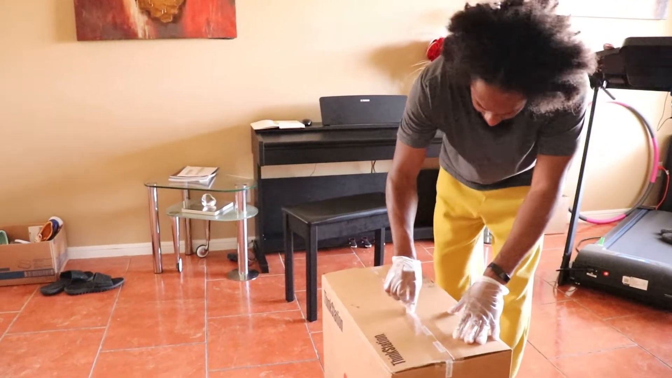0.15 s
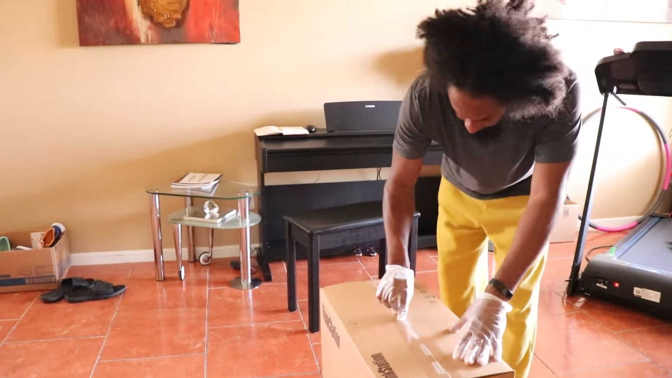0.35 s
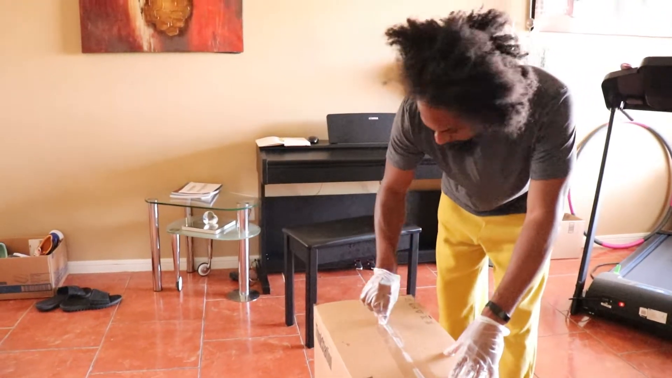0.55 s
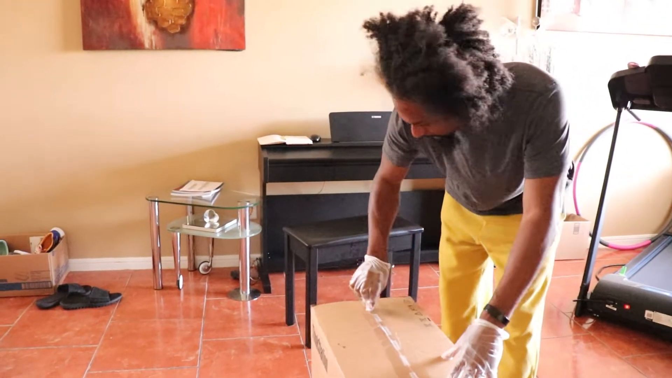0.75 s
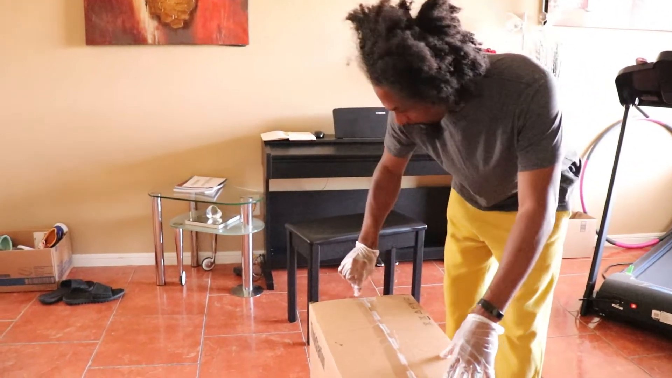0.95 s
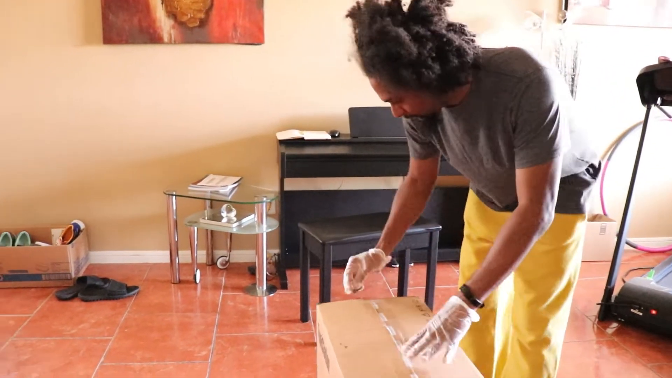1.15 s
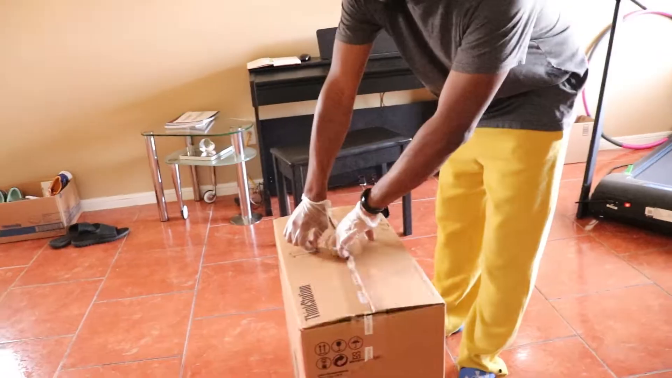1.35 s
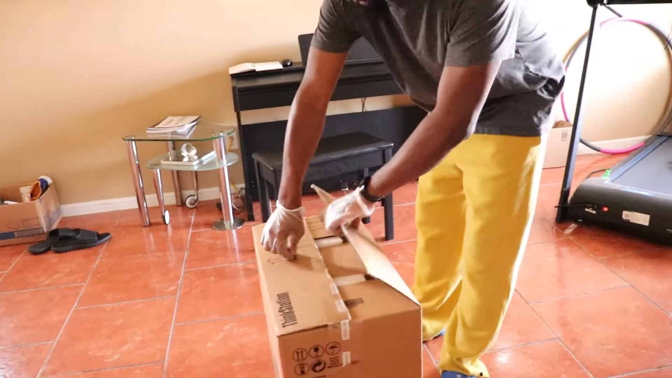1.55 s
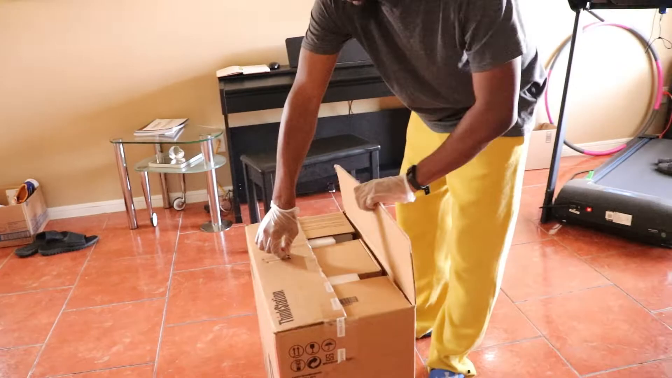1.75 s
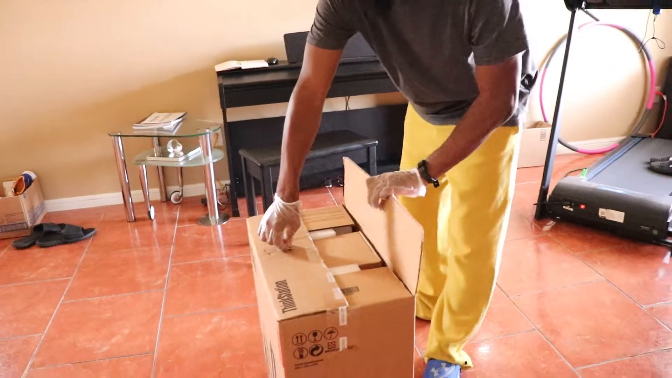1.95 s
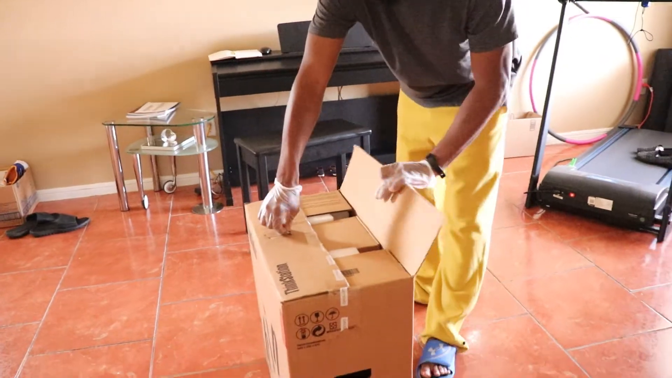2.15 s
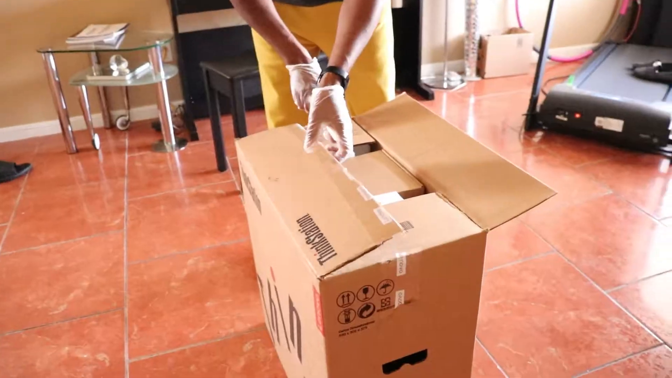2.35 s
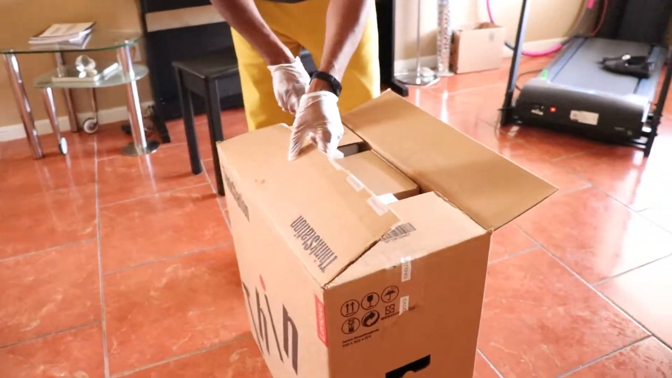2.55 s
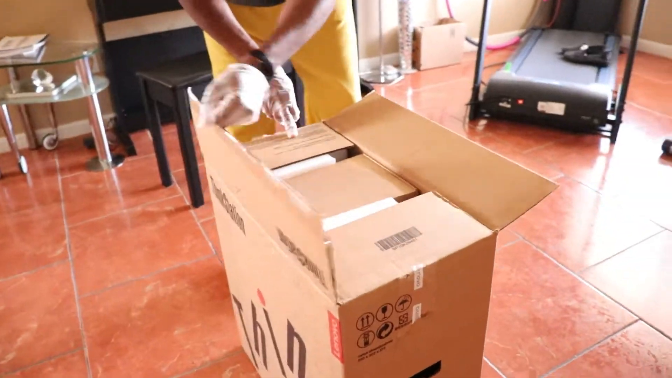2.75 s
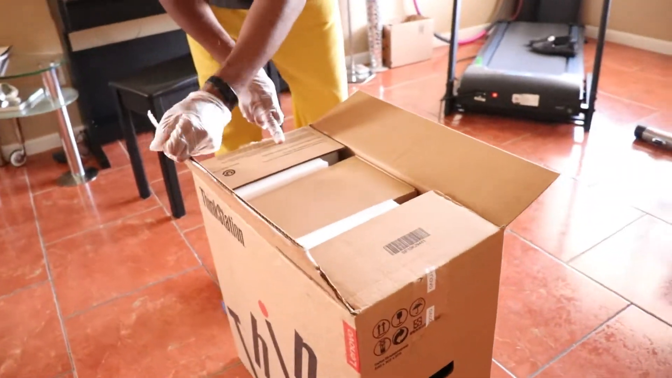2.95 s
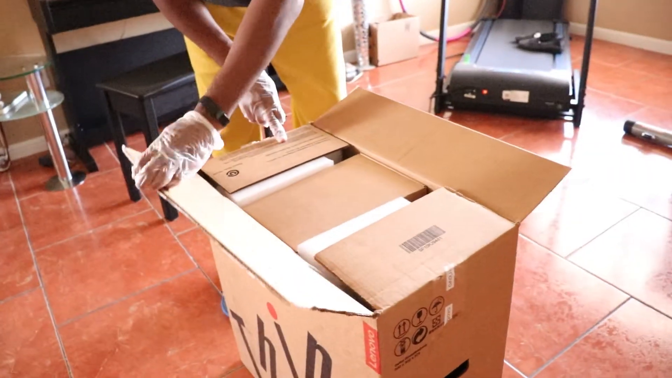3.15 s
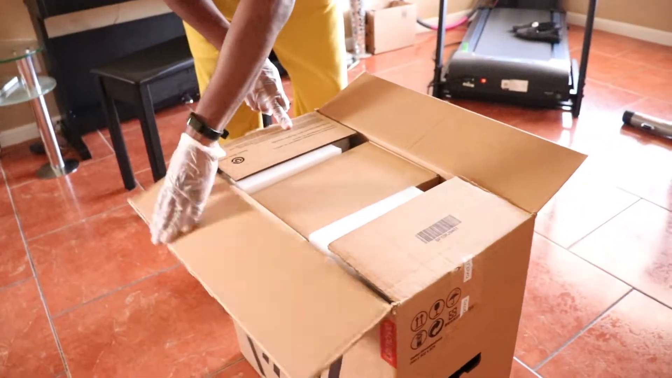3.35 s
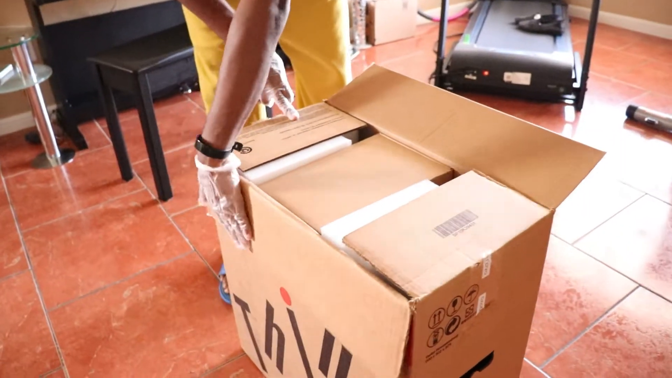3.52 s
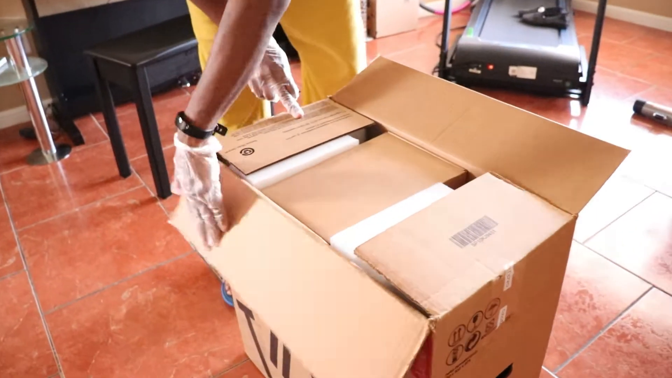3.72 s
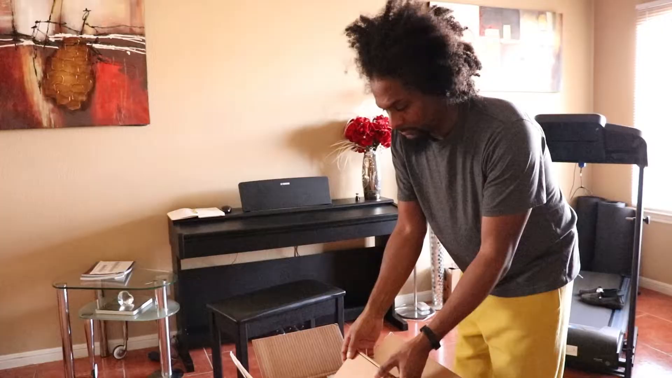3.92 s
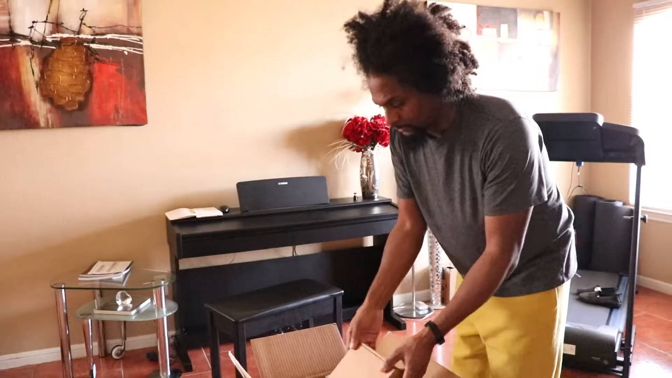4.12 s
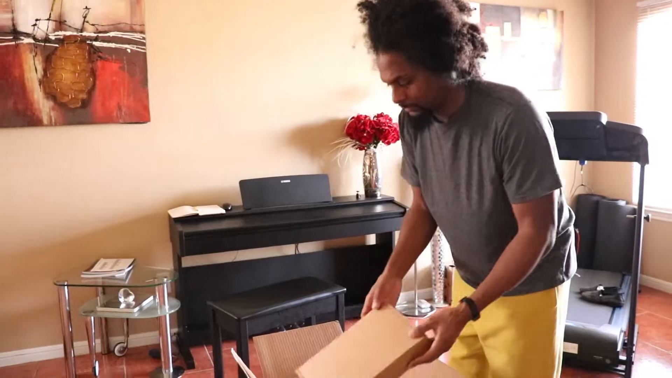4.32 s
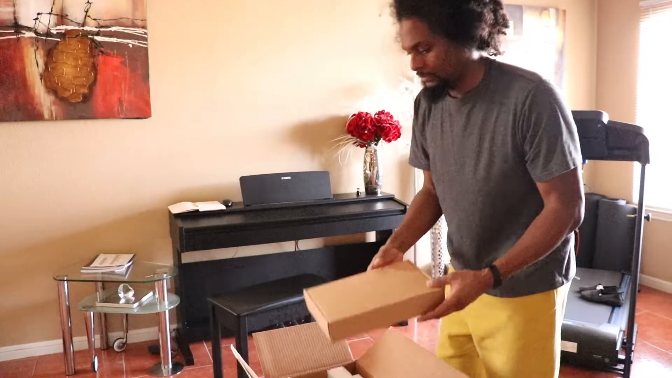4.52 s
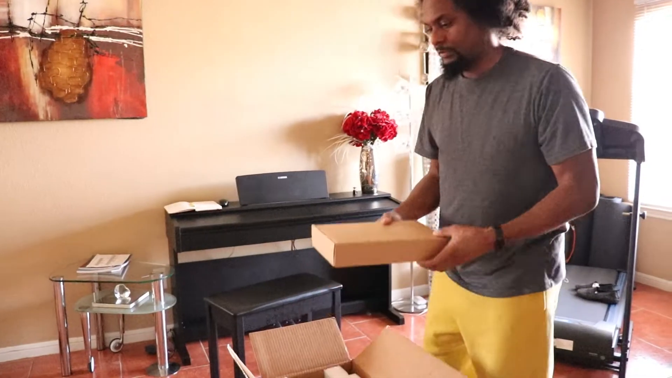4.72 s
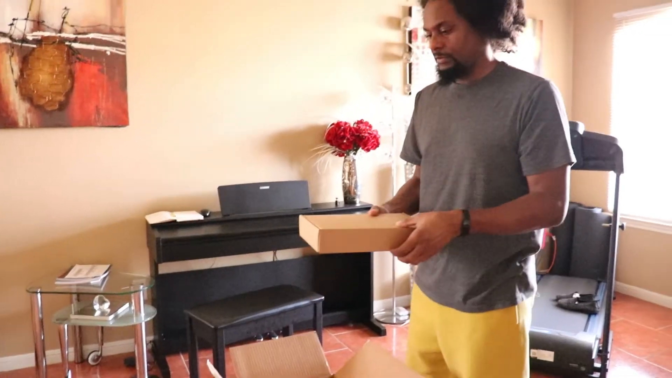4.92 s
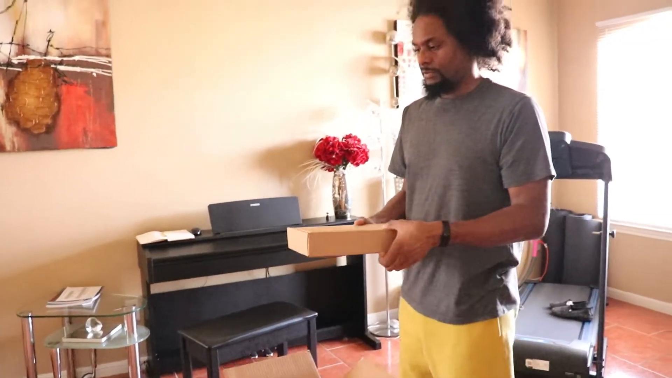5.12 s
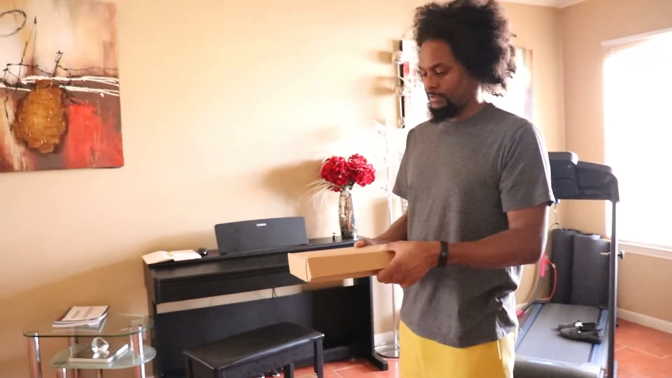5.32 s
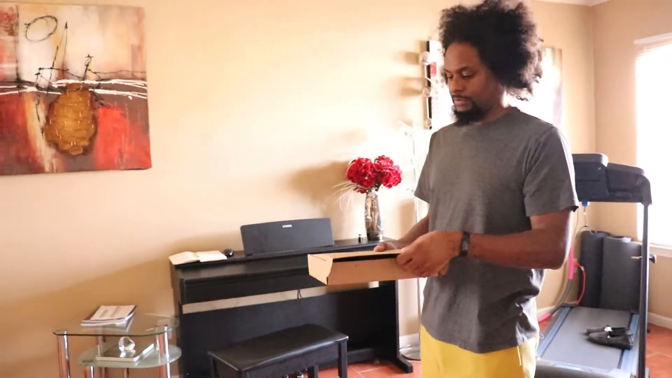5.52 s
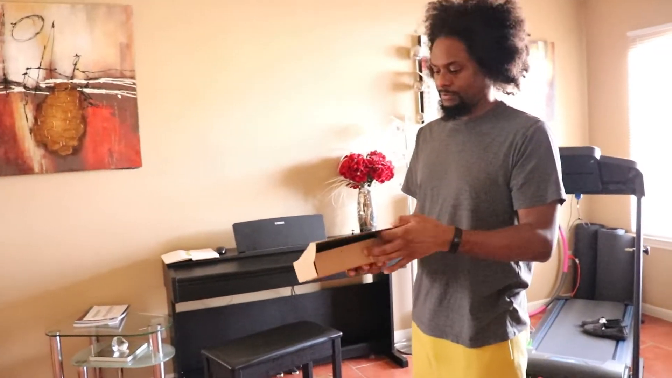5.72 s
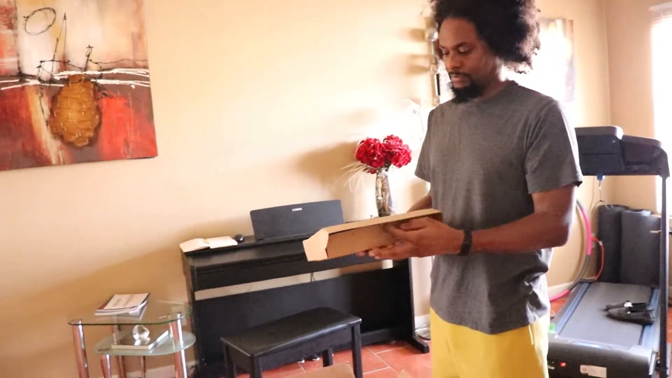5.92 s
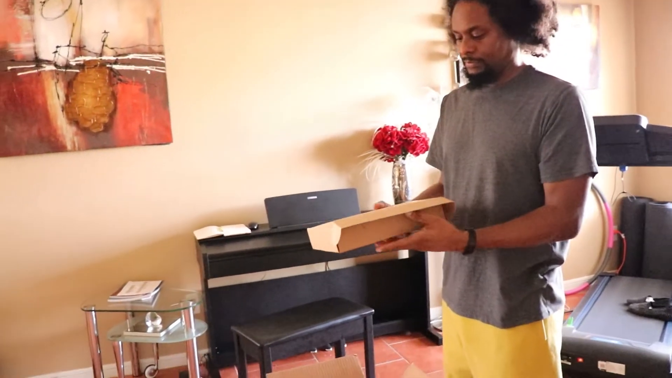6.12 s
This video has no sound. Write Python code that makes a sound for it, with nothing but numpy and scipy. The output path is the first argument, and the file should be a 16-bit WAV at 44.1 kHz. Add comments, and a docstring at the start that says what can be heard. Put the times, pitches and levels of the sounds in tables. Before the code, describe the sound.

Hands scrape and pull open a cardboard box, its flaps cracking and knocking hollowly in an echoing room, followed by softer cardboard sliding.

```python
"""Gloved hands brush over cardboard, and a flap pops free with a hollow knock in a tiled living room.
A shipping box is being opened: its flaps fold back and strike it, exciting the panels and the air inside.
Creases and tape snap in short bursts; stick-slip friction makes the board scrape, crackle and squeak.
A flat inner box is then lifted out and its lid slides open. The hard room rings after every blow."""
import sys
import numpy as np
from scipy import signal
from scipy.fft import rfft, irfft
from scipy.io import wavfile
from scipy.ndimage import uniform_filter1d

SR = 44100
rng = np.random.default_rng(int(sys.argv[2]) if len(sys.argv) > 2 else 0)


def transcribe(signal):
    """Save signal, clipped to [-1, 1], as a 16-bit WAV file at the path in sys.argv[1]."""
    frames = np.atleast_2d(signal).T
    limited = np.clip(frames, -1, 1)
    pcm = np.round(limited * 32767).astype(np.int16)
    wavfile.write(sys.argv[1], SR, pcm)


N = 272390

# spectrum of the steady background: (frequency [Hz], relative level [dB])
BACKGROUND_SPECTRUM = [(15, -39), (25, -20), (80, 3.5), (285, 3.5), (463, -27), (531, 2), (1040, -1),
                       (1370, -3), (2690, -6.5), (3340, -7), (6210, -13), (14800, -14), (16000, -17)]
# reverberation time of the room: (frequency [Hz], T60 [s])
REVERB_T60 = [(100, 0.33), (350, 0.58), (700, 0.93), (1500, 0.95), (3500, 0.94), (7000, 0.83),
              (14000, 0.32)]
# strength of the reverberation: (frequency [Hz], level re direct sound [dB])
REVERB_SPECTRUM = [(40, -11), (110, -4.5), (230, 1), (300, 5), (400, -4.5), (550, -1.5), (1200, -2),
                   (1900, -5), (3200, -3), (7000, -2), (14000, -9)]
# low modes of box and room: (frequency [Hz], relative level [dB], T60 [s])
LOW_MODES = [(59.4, -5, 0.52), (82, -23, 0.52), (118.4, -0.5, 0.45), (164.1, -4, 0.34), (190.3, -5.5, 0.69),
             (233.3, 0, 0.73), (260.8, -6, 0.49), (362.3, -4.5, 0.97), (367, -27, 0.47)]

# rubbing strokes on each box: (start [s], swell [s], release [s], scrape [dB], crackle [dB], drumming [dB])
OUTER_BOX_STROKES = [ (0, 0.0033, 0.16, -39.5, -53.5, -37.5), (.1, 0.14, 0.3, -49, -57, -46),
                     (.56, 0.035, 0.12, -53.5, -44.5, -39), (.64, 0.27, 0.17, -35.5, -48.5, -40.5),
                     (.91, .05, 0.14, -42.5, -42.5, -42), (1.04, 0.067, 0.33, -74, -53.5, -63),
                     (1.35, 0.016, 0.4, -48.5, -43, -47.5), (1.49, 0.0057, 0.28, -26.5, -47.5, -22),
                     (1.52, 0.051, .15, -30.5, -35, -34), (1.78, 0.029, 0.032, -53.5, -47, -60),
                     (2.1, 0.13, 0.13, -76.5, -60, -61), (2.366, .01, 0.33, -47, -44.5, -36),
                     (2.7, 0.011, 0.32, -32.5, -40.5, -27), (2.78, 0.067, .15, -31, -58, -37),
                     (3.06, 0.055, 0.2, -63, -52, -51.5), (3.33, 0.11, 0.1, -53.5, -45.5, -50.5),
                     (3.47, 0.044, 0.042, -40, -37, -40.5), (3.56, 0.061, 0.32, -47, -64, -37),
                     (3.92, 0.024, .05, -70, -55, -66)]
INNER_BOX_STROKES = [ (3.96, 0.0078, 0.35, -87, -96, -54), (4.1, 0.021, 0.68, -54.5, -67.5, -58),
                     (4.16, 0.096, 0.11, -47, -50, -58.5), (4.54, 0.031, 0.049, -65, -78, -65),
                     (4.65, 0.03, 0.11, -50.5, -68.5, -56.5), (4.885, 0.018, 0.07, -59, -77.5, -58),
                     (4.95, 0.011, 0.34, -62, -77, -60), (5.186, 0.007, .3, -45, -56, -50),
                     (5.25, 0.13, 0.2, -38.5, -50, -50.5), (5.39, 0.074, 0.33, -39.5, -55, -47),
                     (5.71, 0.033, 0.17, -38.5, -50, -51), (6.065, 0.036, 0.11, -46.5, -80, -48)]
# friction spectra of each box's surface, the fibres and the panels: (frequency [Hz], relative level [dB])
OUTER_SCRAPE_SPECTRUM = [(40, -29), (300, -12.5), (480, -0.5), (700, 3.5), (1000, 5), (1400, 4), (2000, -2),
                         (3200, -2), (4500, -8.5), (7000, -16.5), (15000, -79)]
INNER_SCRAPE_SPECTRUM = [(270, -17), (420, 8.5), (510, 7.5), (600, 4), (1000, -0.5), (1350, 1.5),
                         (2000, -1.5), (2700, -1), (3300, 2.5), (4400, -8), (7000, -28), (15000, -54.5)]
CRACKLE_SPECTRUM = [(200, -26), (1500, -1), (2400, 0), (3250, 6), (4300, 2.5), (6000, 1), (9000, -3),
                    (15000, -12)]
DRUMMING_SPECTRUM = [(35, -48), (70, 1), (130, -5), (190, 2), (250, 4.5), (305, 7), (390, 4.5), (500, 0),
                     (620, -3), (900, -33.5)]
# spectra of a slipping fold, cracking board and slapping board: (frequency [Hz], relative level [dB])
FOLD_SPECTRUM = [(2000, -24), (3200, -12), (4000, 5), (5300, 4.5), (6500, -5), (7900, -5), (9500, -31),
                 (15000, -25)]
BOARD_SPECTRUM = [(400, -9.5), (850, 7.5), (1250, 10), (1650, 5), (2300, 2.5), (3100, 3), (4200, 0.5),
                  (6500, 1), (9500, -1), (15000, -2.5)]
SLAP_SPECTRUM = [(150, -14), (450, 7), (600, 0.5), (800, -3), (1100, -3), (1350, -3), (1600, -24),
                 (5000, -40.5), (15000, -51.5)]
# a fold sticking and slipping: (time [s], level [dB], slip rate [1/s], length [s])
FOLD_SQUEAKS = [(2.834, -29.5, 1305, 0.0079), (2.839, -32, 1325, 0.094), (2.932, -45, 1290, 0.0042)]
# creases and edges cracking: (time [s], level [dB], centre [Hz], length [s], roll-off [dB/octave])
CREASE_CRACKS = [ (0.2192, -27.5, 2980, 0.0038, 11.5), (0.302, -33, 2230, 0.016, 9),
                 (.559, -28.5, 2770, 0.0041, 20.5), (0.586, -36.5, 1470, 0.019, 23),
                 (.7713, -33, 3040, .003, 28), (0.877, -36, 1900, .016, 25), (0.96, -30, 3300, 0.0039, 12),
                 (1.108, -34, 2895, 0.0048, 15.5), (1.177, -42.5, 2800, 0.0045, 15),
                 (1.358, -45.5, 2930, 0.0077, 9), (1.39, -39.5, 3080, .003, 30),
                 (1.4861, -16, 3220, .015, 9), (1.5325, -16, 2760, 0.003, 12),
                 (2.3628, -19, 2400, 0.005, 10.5), (2.603, -24.5, 1740, 0.0045, 10.5),
                 (2.6955, -22.5, 1770, 0.0033, 16), (2.732, -32, 3520, 0.02, 10),
                 (2.833, -26, 3180, .011, 7.5), (2.9498, -29, 3420, 0.0038, 27),
                 (3.158, -42.5, 5040, .005, 17), (3.468, -40.5, 1650, 0.0055, 13),
                 (3.4946, -32.5, 4550, .0048, 9), (3.555, -28, 2370, 0.004, 11),
                 (3.557, -24, 720, 0.0066, 36), (3.66, -39.5, 6000, 0.0049, 22),
                 (3.7023, -28.5, 3930, 0.0091, 11.5), (4.57, -60, 1100, .016, 17),
                 (4.949, -53, 1900, 0.011, 14), (5.189, -46.5, 3260, 0.0076, 8),
                 (5.264, -44, 3300, 0.0069, 35), (5.491, -40, 890, 0.026, 13),
                 (5.7203, -36.5, 1420, 0.062, 14), (6.066, -39, 2000, .0084, 13.5)]
# tape and thin edges letting go: (time [s], level [dB], centre [Hz])
TAPE_TICKS = [(.182, -51.5, 6000), (0.22, -38.5, 11000), (0.4342, -42, 13400), (.854, -40, 5000),
              (1.3845, -39.5, 6000), (2.338, -41.5, 4000), (2.3641, -32.5, 11300), (2.639, -40, 7000),
              (2.696, -35, 12000), (3.1085, -53, 7000), (3.3995, -45, 5500), (3.418, -48, 7000),
              (3.4363, -33.5, 6500), (5.28, -46, 5500), (5.463, -42.5, 5500)]
# flaps striking the box: (time [s], panel level [dB], panel frequency [Hz], thump [dB], slap [dB])
FLAP_KNOCKS = [ (0.2185, -20.5, 305, -31, -33), (1.356, -38, 320, -50.5, -54),
               (1.4872, -17.5, 251, -27, -15), (1.5326, -15, 414, -28, -15.5),
               (1.548, -14.5, 453, -26, -21.5), (1.5755, -14.5, 478, -44, -29), (1.698, -25, 467, -50, -32),
               (2.364, -19, 327, -38, -21), (2.604, -30, 353, -49, -38), (2.6968, -12.5, 388, -21, -12.5),
               (2.728, -19, 360, -20.5, -45), (2.767, -21.5, 378, -26, -29), (2.809, -22, 380, -32, -22.5),
               (2.822, -16, 332, -18.5, -30), (2.838, -17.5, 278, -24, -24), (3.555, -18, 294, -15.5, -21),
               (4.94, -53, 275, -58, -55), (5.147, -59, 278, -69, -52), (5.719, -42.5, 450, -67, -53),
               (6.0655, -56, 404, -68, -42.5)]


def amplitude(db):
    """Decibels as an amplitude ratio."""
    return 10 ** (np.asarray(db) / 20)


def unit_rms(x):
    """Normalisation to unit mean power."""
    return x / np.sqrt(np.mean(x ** 2) + 1e-20)


def at_level(x, db):
    """A transient scaled to the energy of 10 ms of steady sound at the given level."""
    return amplitude(db) * x * np.sqrt(SR / 100 / (np.sum(x ** 2) + 1e-20))


def curve_at(points, hz):
    """Interpolation on a logarithmic frequency axis."""
    table_hz, value = np.transpose(points)
    return np.interp(np.log(hz + 1), np.log(table_hz + 1), value)


def add(mix, start_s, sound):
    """Superposition of a sound on the mix."""
    part = mix[max(round(start_s * SR), 0):][:len(sound)]
    part += sound[:len(part)]


def coloured(x, spectrum, size=2048):
    """Minimum-phase filtering: the phase follows from the log magnitude by the Hilbert transform."""
    log_gain = np.log(amplitude(curve_at(spectrum, abs(np.fft.fftfreq(size, 1 / SR)))))
    taps = np.fft.ifft(np.exp(np.conj(signal.hilbert(log_gain)))).real
    return signal.oaconvolve(x, taps[:size // 2])[:len(x)]


def background(hiss_db=-58.5, rumble_db=-76, rumble_hz=50):
    """Stationary noise: room sound and hiss over a faint deep rumble."""
    white, hz = rfft(rng.standard_normal(N)), np.fft.rfftfreq(N, 1 / SR)
    rumble = unit_rms(irfft(white / (1 + (hz / rumble_hz) ** 2), N))
    hiss = unit_rms(irfft(white * amplitude(curve_at(BACKGROUND_SPECTRUM, hz)), N))
    return amplitude(hiss_db) * hiss + amplitude(rumble_db) * rumble


def room_response(gap_s=0.0055, reflections_per_s=4000, size=256):
    """A diffuse field: reflections of random sign decay exponentially, each band at its own rate."""
    reflections = unit_rms(rng.choice([-1, 1], SR) * (rng.random(SR) < reflections_per_s / SR))
    reflections *= np.arange(SR) / SR > gap_s
    hz, t, bands = signal.stft(reflections, SR, nperseg=size)
    decay_rate = np.log(1000) / curve_at(REVERB_T60, hz)[:, None]
    decay = np.sqrt(2 * decay_rate / SR) * np.exp(-decay_rate * t)  # unit energy in each band
    bands *= amplitude(curve_at(REVERB_SPECTRUM, hz))[:, None] * decay
    return signal.istft(bands, SR, nperseg=size)[1]


def reverberation(x, block=50000):
    """Convolution with the room, whose pattern of reflections changes about once a second with movement."""
    out = np.zeros(len(x))
    for start in range(0, len(x), block):
        add(out, start / SR, signal.fftconvolve(x[start:start + block], room_response()))
    return out


def floor_bounce(x, notch_hz=303, width_hz=45, depth=0.56):
    """Destructive interference: the reflection off the tiles weakens a narrow band of the lower midrange."""
    b, a = signal.iirpeak(notch_hz, notch_hz / width_hz, fs=SR)
    return x - depth * signal.lfilter(b, a, x)


def low_resonance(x, gain_db):
    """Resonance: the low modes of box and room ring on after each excitation."""
    t = np.arange(SR // 2) / SR
    modes = sum(amplitude(db + gain_db) * np.cos(2 * np.pi * hz * t) * 1000 ** (-t / t60) / t60
                for hz, db, t60 in LOW_MODES)
    return signal.fftconvolve(x, modes * 2 * np.log(1000) / SR)[:len(x)]


def random_slips(per_s, spread_db):
    """A Poisson process: impulses of either sign, a few larger than the rest."""
    chance, slips = rng.random(N) * SR / per_s, np.zeros(N)
    at = np.flatnonzero(chance < 1)
    sign = 1 - 2 * (at % 2)
    slips[at] = sign * amplitude(spread_db * np.minimum(-np.log(chance[at]), 4))
    return slips


def stroke_envelope(swell_s, release_s, touch_s=0.0025, touch_db=-9):
    """Exponential growth and decay: a light touch swells, then falls to a tenth in the release time."""
    age = np.arange(0, swell_s + 3 * release_s, 1 / SR)
    db = np.minimum(touch_db * (1 - age / swell_s), -20 * (age - swell_s) / release_s)
    return np.minimum(age / touch_s, 1) * amplitude(db)


def rubbing(strokes, scrape_spectrum, judder_db=1.0, judders_per_s=45):
    """Sliding friction: tiny slips scrape, catching fibres crackle and slower judders drum the panels."""
    grip = rng.standard_normal(1000)  # the board grips and lets go unevenly
    grip_position = np.arange(N) / SR * judders_per_s
    pressure = amplitude(judder_db * np.interp(grip_position, np.arange(len(grip)), grip))
    scrape = coloured(random_slips(per_s=2500, spread_db=1.0), scrape_spectrum)
    crackle = coloured(random_slips(per_s=3000, spread_db=3), CRACKLE_SPECTRUM)
    drumming = coloured(random_slips(per_s=550, spread_db=0.5), DRUMMING_SPECTRUM)
    layers, effort_exponents = (scrape, crackle, drumming), (1, 0.95, 1)
    powers = np.zeros((len(layers), N))
    for start, swell, release, *levels in strokes:
        effort = stroke_envelope(swell, release)
        for power, db, exponent in zip(powers, levels, effort_exponents):
            add(power, start, (amplitude(db) * effort ** exponent) ** 2)  # strokes add in power
    return sum(np.sqrt(power) * unit_rms(pressure * layer) for power, layer in zip(powers, layers))


def fold_squeaks(unevenness=0.033, wander=0.016, count=200, size=8192):
    """Stick-slip oscillation: a fold slips almost periodically, and the slip rate is heard as pitch."""
    out = np.zeros(N)
    for start, db, per_s, length in FOLD_SQUEAKS:
        jitter, drift = rng.standard_normal((2, count))
        slow_drift = unit_rms(uniform_filter1d(drift, size=25))
        slip_times = np.cumsum(1 + unevenness * jitter + wander * slow_drift) / per_s
        slip_times = np.clip(slip_times, 0, length)
        slips = np.zeros(size)
        slips[(slip_times * SR).astype(int)] = np.sin(np.pi * slip_times / length)
        add(out, start, at_level(coloured(slips, FOLD_SPECTRUM), db))
    return out


def fibre_burst(length_s, size=2048):
    """A broadband transient: many fibres give way together in a decaying puff of noise."""
    age = np.arange(size) / SR / length_s
    puff = rng.standard_normal(size) * 10 ** -age
    for _ in range(3):  # flatten the spectrum while keeping the puff short
        spectrum = rfft(puff)
        puff = irfft(spectrum / np.sqrt(abs(spectrum) + 1e-9)) * np.exp(-(age / 2) ** 4)
    return puff


def crack(db, centre_hz, length_s, db_per_octave):
    """Fracture: a burst is filtered by the stiff patch of board that breaks."""
    hz = np.geomspace(20, 20000, 60)
    octaves_away = np.hypot(np.log2(hz / centre_hz), 0.4)  # rounded at the centre
    hump_db = curve_at(BOARD_SPECTRUM, hz) - db_per_octave * octaves_away
    return at_level(coloured(fibre_burst(length_s), np.transpose([hz, hump_db]), size=1024), db)


def snaps():
    """Sudden release of strain: creases crack, while tape and thin edges give short bright ticks."""
    out = np.zeros(N)
    for start, *crease in CREASE_CRACKS:
        add(out, start, crack(*crease))
    for start, db, hz in TAPE_TICKS:
        add(out, start, crack(db, hz, length_s=0.0033, db_per_octave=5))
    return out


def damped_mode(hz, t60, t):
    """Free vibration of a damped oscillator."""
    return np.sin(2 * np.pi * hz * t) * np.exp(-np.log(1000) * t / t60)


def flap_knocks(thump_t60=0.048, panel_t60=0.021, yield_s=0.0015, slap_s=0.014, cutoff_hz=85):
    """Impact excitation: each blow pushes the air in the box, bends a panel and slaps board on board."""
    out, t = np.zeros(N), np.arange(SR // 5) / SR
    onset = 1 - np.exp(-t / yield_s)  # the board yields before it moves
    for start, panel_db, panel_hz, thump_db, slap_db in FLAP_KNOCKS:
        thump = onset * damped_mode(panel_hz / 2, thump_t60, t)  # the whole wall, an octave below its panel
        panel = onset * damped_mode(panel_hz, panel_t60, t)
        slap = coloured(fibre_burst(slap_s), SLAP_SPECTRUM)
        add(out, start, at_level(thump, thump_db))
        add(out, start, at_level(panel, panel_db))
        add(out, start, at_level(slap, slap_db))
    # a panel this small radiates little deep bass
    return signal.sosfilt(signal.butter(4, cutoff_hz, "high", fs=SR, output="sos"), out)


def scene(inner_box_s=3.958):
    """Direct sound, resonance and reverberation add: first the outer box on the floor, then the inner."""
    split = round(inner_box_s * SR)  # the scene changes here: the outer box and its ringing stop short
    transients = flap_knocks() + snaps() + fold_squeaks()
    outer = floor_bounce((transients + rubbing(OUTER_BOX_STROKES, OUTER_SCRAPE_SPECTRUM))[:split])
    inner = (transients + rubbing(INNER_BOX_STROKES, INNER_SCRAPE_SPECTRUM))[split:]
    outer_in_room = outer + low_resonance(outer, gain_db=10) + reverberation(outer)
    inner_in_room = inner + low_resonance(inner, gain_db=3.5) + reverberation(inner)
    return (np.concatenate([outer_in_room, inner_in_room]) + background())[None]


def record(dry, ceiling=0.85, cutoff_hz=15850):
    """Soft saturation rounds the loudest peaks, and a low-pass filter limits the bandwidth."""
    rounded = dry / (1 + (dry / ceiling) ** 6) ** (1 / 6)
    low_pass = signal.firwin(401, cutoff_hz, window=("kaiser", 8), fs=SR)
    return signal.oaconvolve(rounded, low_pass[None], "same")


dry = scene()
out = record(dry)
transcribe(out)
```